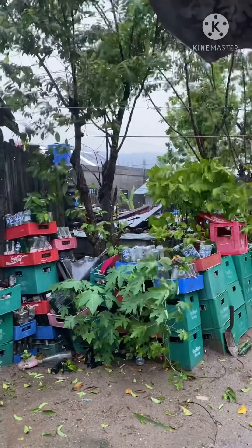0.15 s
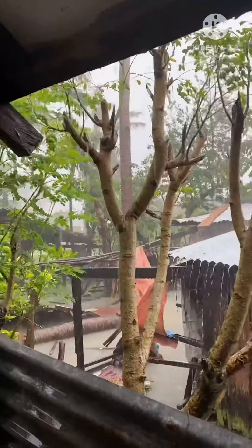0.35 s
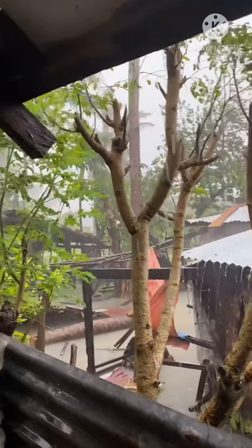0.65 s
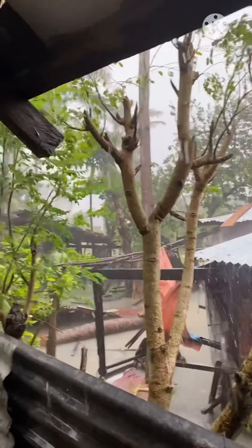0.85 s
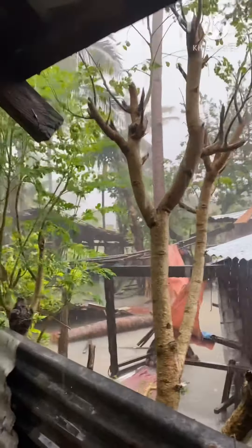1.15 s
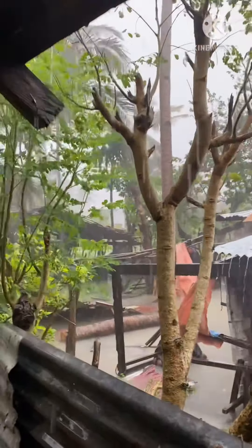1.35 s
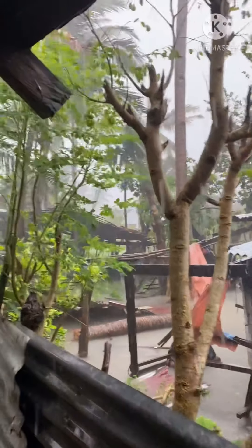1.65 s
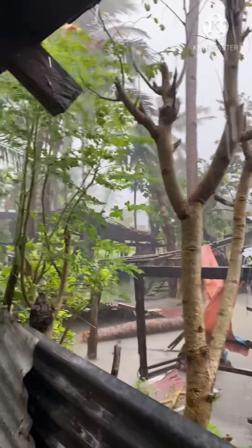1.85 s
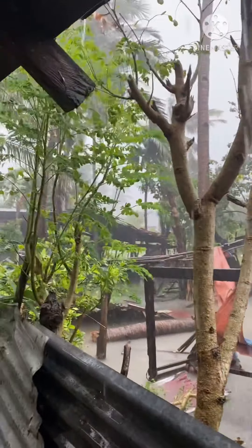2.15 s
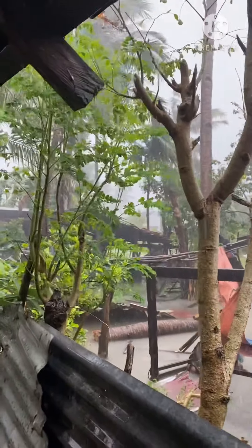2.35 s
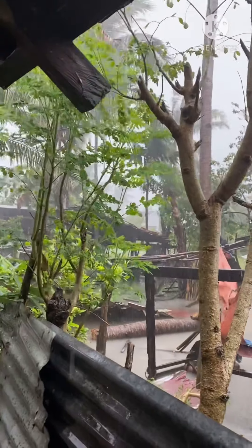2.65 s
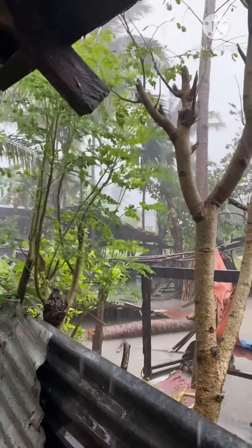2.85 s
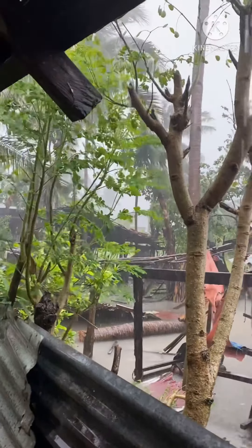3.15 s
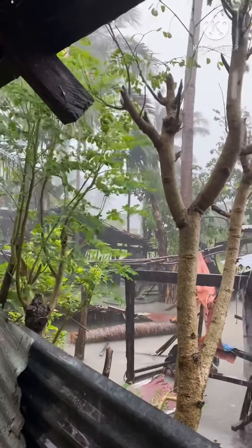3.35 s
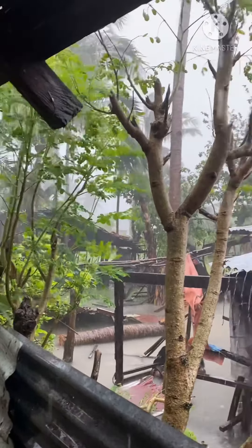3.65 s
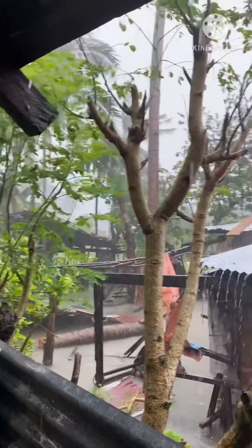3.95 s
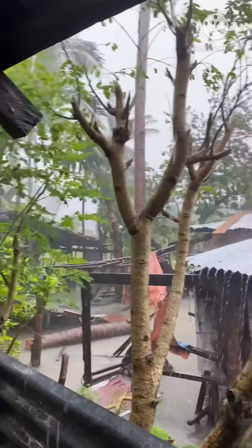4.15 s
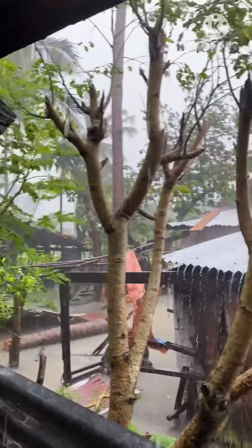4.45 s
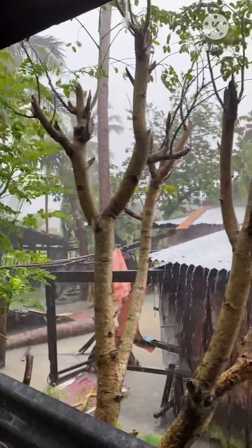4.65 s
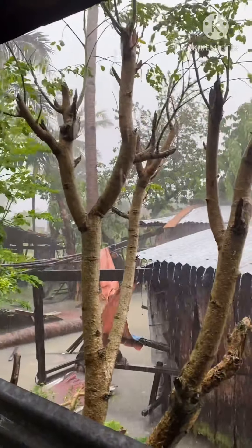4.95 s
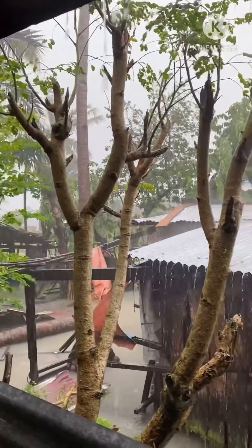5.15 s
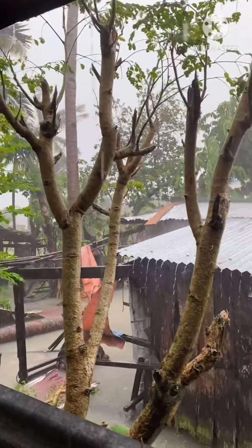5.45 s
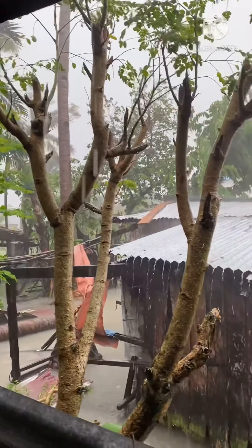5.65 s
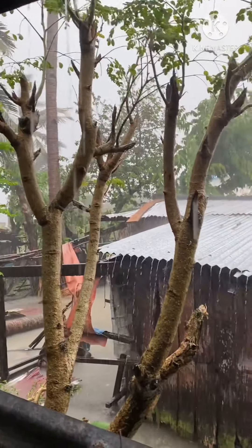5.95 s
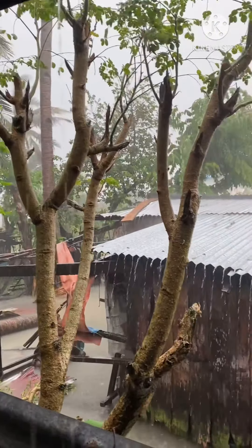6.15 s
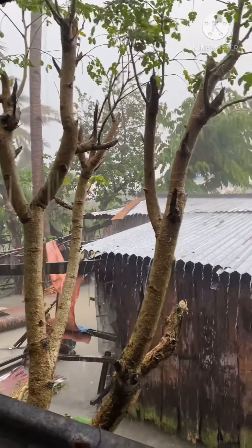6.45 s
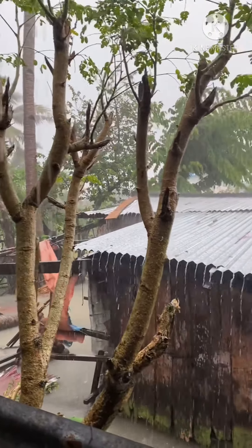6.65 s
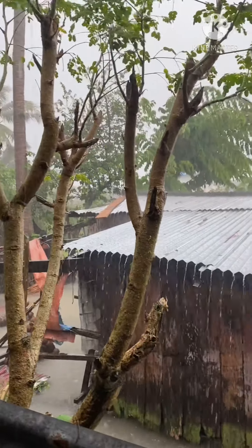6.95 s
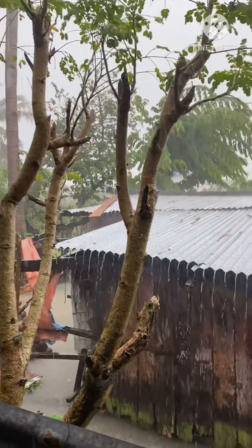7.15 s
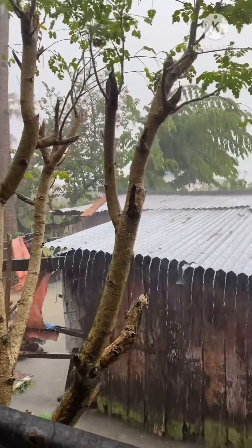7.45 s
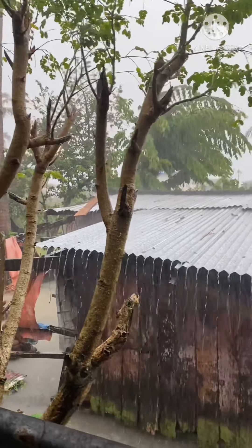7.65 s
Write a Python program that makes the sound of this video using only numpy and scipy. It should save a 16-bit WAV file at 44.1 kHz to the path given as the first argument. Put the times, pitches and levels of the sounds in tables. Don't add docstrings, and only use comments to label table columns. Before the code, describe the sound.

Steady downpour hisses and patters on corrugated metal after a short blustery opening and a gap, with close eave drips and soft wind buffets.

```python
import sys
import numpy as np
from scipy import signal
from scipy.io import wavfile
from scipy.ndimage import uniform_filter1d

SR = 44100
rng = np.random.default_rng(int(sys.argv[2]) if len(sys.argv) > 2 else 0)


def linear_from_db(decibels):
    return 10 ** (np.asarray(decibels, float) / 20)


def put_to_file(sound):
    columns = np.atleast_2d(sound).T
    safe = np.clip(columns, -1, 1)
    whole_steps = np.round(safe * 32767)
    wavfile.write(sys.argv[1], SR, whole_steps.astype(np.int16))


N = 343098


def evened(x):
    return x / np.sqrt(np.mean(x ** 2) + 1e-20)


def read(points, hz):
    f, value = np.transpose(points)
    return np.interp(np.log(hz + 1), np.log(f + 1), value)


def curve(rows, t):
    s, *columns = np.transpose(rows)
    return [np.interp(t, s, column) for column in columns]


def add(mix, s, sound):
    part = mix[:, round(s * SR):][:, :sound.shape[1]]
    part += sound[:, :part.shape[1]]


# (frequency [Hz], lead [radians])
LEAD = [(0, 0), (1980, 0.12), (3100, 1.0), (4390, 1.0), (5150, -0.6), (6100, 1.92), (7350, 3), (10600, 6.5),
        (13550, 9.5), (14800, 10.6), (16000, 12.5)]
# (frequency [Hz], left minus right [dB])
TILT = [(60, -0.5), (130, -0.3), (290, -0.5), (640, -2), (1410, -0.5), (3100, -0.5), (6820, 0.0),
        (15000, -0.5)]


def ports(pair, shape, same, size):
    hz, t, (a, b) = signal.stft(pair, SR, "cosine", size)
    like = np.clip(read(same, hz), 0, 1)[:, None]
    f, lead = np.transpose(LEAD)
    late = np.exp(-1j * np.interp(hz, f, lead))[:, None]
    tilt = linear_from_db(read(TILT, hz) / 2)[:, None]
    left = a * tilt
    right = (like * a + np.sqrt(1 - like ** 2) * b) * late / tilt
    z = np.array([left, right]) * linear_from_db(shape(hz[:, None], t))
    return evened(signal.istft(z, SR, "cosine", size)[1][:, :pair.shape[1]])


def wind(colour, same, lump, hold_s, size):
    lumps = evened(uniform_filter1d(uniform_filter1d(rng.standard_normal(size), lump), lump))
    noise = rng.standard_normal((2, size))
    air = ports(noise, lambda hz, t: read(colour, hz) + 0 * t, same, size=4096)
    hold = round(hold_s * SR)
    power = uniform_filter1d((air ** 2).mean(0), hold)
    air /= np.sqrt(power + .05)
    lumpy_db = 2.0
    return np.pad(evened(air * linear_from_db(lumpy_db * lumps)), ((0, 0), (0, N - size)))


# (time [s], gust level [dB], rain level [dB])
FIRST = [
    (0, -16, -52),
    (.015, -20.5, -50),
    (.04, -24, -52),
    (.06, -9.5, -48.5),
    (.08, -10.5, -52.5),
    (.115, -13, -48),
    (.145, -20.5, -50),
    (.19, -14.5, -51.5),
    (.215, -13, -44.5),
]
# (frequency [Hz], level per Hz [dB])
GUST = [(12, -51), (27, -20), (55, 2.5), (100, 3), (160, -3), (253, -5), (400, -8), (700, -11.5),
        (1000, -18), (1500, -39), (3000, -48.5)]
# (frequency [Hz], likeness [0 to 1])
GUST_SAME = [(60, 1), (200, 1), (350, 0.9), (700, 0.45), (2000, .6)]


def first_shot(t, wet):
    gust_db, light_db = curve(FIRST, t)
    gust = wind(GUST, GUST_SAME, lump=60, hold_s=0.01, size=SR // 2)
    return linear_from_db(gust_db) * gust + linear_from_db(light_db + 18) * wet


def drops(per_s, spread_db):
    size_db = spread_db * np.minimum(rng.exponential(1, (2, N)), 5)
    size = linear_from_db(size_db) * rng.choice([-1., 1.], (2, N))
    return size * (rng.random((2, N)) < per_s / SR)


# (frequency [Hz], level [dB], time to fall 60 dB [s])
TIN = [
    (547, 4, 0.035),
    (797, 2.5, 0.04),
    (1284, -1.5, 0.03),
    (1512, -0.5, 0.029),
    (1990, -8, 0.038),
    (2980, -13, 0.0079),
]
# (frequency [Hz], likeness [0 to 1])
SAME = [(70, 0.94), (180, 0.9), (330, 0.96), (750, 0.74), (1100, 0.83), (1600, 0.9), (1950, 0.9),
        (2400, 0.64), (4500, .5), (5300, .72), (7500, 0.71), (11000, .63), (13500, .65), (15000, .55)]


def tin():
    blows = drops(per_s=1800, spread_db=2.5)
    patch = rng.integers(0, len(TIN), (2, N))
    out = np.zeros((2, N))
    for k, (hz, db, t60) in enumerate(TIN):
        r = 1000 ** (-1 / (t60 * SR))
        turn = 2 * np.pi * hz / SR
        ring = signal.lfilter([1], [1, -2 * r * np.cos(turn), r * r], blows * (patch == k))
        out += linear_from_db(db) * np.sin(turn) * ring
    return ports(out, lambda hz, t: 0 * hz * t, SAME, size=512)


# (time [s], level [dB], brightness at the top [dB])
RAIN = [
    (0.55, -25.5, -0.5),
    (0.63, -24.5, -1),
    (3.16, -26, 0.5),
    (4.67, -24.5, 0),
    (5.0, -25, 0),
    (6.75, -25, -0.5),
    (7.1, -24, -0.5),
    (7.78, -24.5, -0.5),
]
# (frequency [Hz], level per Hz [dB])
WASH = [(40, -36), (120, -2.5), (300, -3.5), (520, -2.5), (800, 0.8), (1100, -0.44), (1500, -.5),
        (1900, -4), (2700, -6), (3800, -11), (5500, -12.5), (8000, -14.5), (11000, -16.5), (15500, -18)]


def rain():
    hits = signal.lfilter([1], [1, -.93], abs(drops(per_s=1500, spread_db=2.5)))
    spatter = hits * rng.standard_normal((2, N))
    source = rng.standard_normal((2, N)) + linear_from_db(-8) * evened(spatter)

    def shape(hz, t):
        patches = rng.standard_normal((len(hz), len(t)))
        patches = evened(uniform_filter1d(uniform_filter1d(patches, 8, axis=0), 12, axis=1))
        flicker = evened(uniform_filter1d(rng.standard_normal(len(t)), 6))
        bright_db = curve(RAIN, t)[1] * np.clip(np.log2(hz / 2500 + 1e-9) / 2, 0, 1)
        return read(WASH, hz) + bright_db + .7 * patches + 0.43 * flicker

    wash = ports(source, shape, SAME, size=512)
    return evened(wash + linear_from_db(-12.0) * tin())


# (time of peak [s], level [dB], length [s])
BUFFETS = [(.95, -40, 0.34), (1.61, -35, 0.06), (2.005, -34, 0.13), (2.55, -38, .2), (2.75, -32.5, 0.16),
           (2.972, -35, .1), (3.316, -34, .07), (3.427, -33, 0.074), (4.446, -32, .1), (4.72, -34, 0.29),
           (4.986, -25.5, 0.21), (5.197, -40, .3), (5.65, -39, 0.21), (5.983, -29.5, .12), (6.14, -24, .13),
           (6.257, -27, 0.11), (6.357, -30, 0.08), (6.584, -35, 0.07)]
# (frequency [Hz], level per Hz [dB])
RUMBLE = [(15, -50), (32, -26), (48, 1.5), (90, 2.5), (125, -0.5), (160, -13.5), (250, -20.5), (500, -52)]
# (frequency [Hz], likeness [0 to 1])
RUMBLE_SAME = [(50, 0.87), (110, 0.94), (180, 0.5)]


def buffets(t):
    breeze_db = -40
    power = linear_from_db(breeze_db) ** 2
    for s, db, length in BUFFETS:
        swell = np.cos(np.pi * np.clip((t - s) / length, -.5, .5)) ** 2
        power = power + linear_from_db(db) ** 2 * swell
    return np.sqrt(power) * wind(RUMBLE, RUMBLE_SAME, lump=900, hold_s=0.018, size=N)


# (time [s], peak level [dB], left minus right [dB])
DRIPS = [(1.22, -25, -2), (1.3506, -22.5, -1.5), (1.7795, -23, -0.5), (2.1684, -22.5, -1.0),
         (2.1919, -25, 1.5), (2.6994, -35, -0.5), (2.7794, -27, -2), (2.8794, -25, 0.5),
         (3.0096, -22.5, -1), (3.5889, -22.5, 0.0), (4.5694, -29, -2.5), (4.679, -26.5, 0.0)]


def drips():
    out, t = np.zeros((2, N)), np.arange(1200) / SR
    bright = signal.butter(1, [3500, 10000], "band", fs=SR)
    bursts = rng.standard_normal((len(DRIPS), 2, 1200))
    for (s, db, pan_db), burst in zip(DRIPS, bursts):
        decay = linear_from_db(db + 0.5 - 60 * t / 0.07)
        splash = signal.lfilter(*bright, burst) * decay * np.minimum(t / .002, 1)
        add(out, s, splash * linear_from_db(np.array([[.5], [-.5]]) * pan_db))
    return out


# (time [s], level [dB], starting pitch [Hz], length [s])
BUBBLES = [
    (6.868, -31, 735, 0.031),
    (6.905, -18.5, 610, 0.015),
    (6.923, -22, 701, 0.0265),
]


def gutter():
    out = np.zeros((2, N))
    for s, db, hz, length in BUBBLES:
        u = np.arange(0, 1, 1 / (length * SR))
        rising = np.sin(2 * np.pi * hz * length * (u + 0.144 * u ** 2))
        tone = rising * np.sin(np.pi * u) ** .5
        add(out, s, linear_from_db(db) * tone * linear_from_db(np.array([[-4.], [3.]])))
    return out


CUT_S, CUT_RAMP_S = .2212, .0015
FADE_START_S, FADE_END_S = 0.343, 0.49


def scene():
    t = np.arange(N) / SR
    wet = rain()
    first = first_shot(t, wet)
    pour = linear_from_db(curve(RAIN, t)[0] + 2.01) * wet + buffets(t) + drips() + gutter()
    fade_out = np.clip((CUT_S - t) / CUT_RAMP_S, 0, 1)
    fade_in = np.clip((t - FADE_START_S) / (FADE_END_S - FADE_START_S), 0, 1) ** 1.19
    return first * fade_out + pour * fade_in


def spell(t, start, end, edge):
    return np.clip(np.minimum(t - start, end - t) / edge + .5, 0, 1)


# (start [s], end [s], level of the left-right difference [dB])
WIDE_SPELLS = [
    (.36, 1.13, -4),
    (1.25, 1.5, -18),
    (1.5, 2.36, 2),
    (2.36, 3.3, -5),
    (4.25, 5.55, -4),
    (4.544, 5.15, 6),
    (5.662, 7.0, -6),
    (5.955, 6.75, 5.5),
]
# (frequency [Hz], margin [dB])
LOST = [(1500, 15.5), (2000, 14), (5300, 9.5), (6600, 4.5), (8000, 5.5), (9300, 3.5), (11400, 2.5),
        (12700, 4.5), (13800, 2.5), (14800, 3.0)]
# (start [s], end [s], by how much [dB])
EASED = [
    (-.2, .28, 0.3),
    (1.4, 6.45, 0.55),
    (2.2, 5.0, 0.74),
]
BANDS = [0, 64, 72, 80, 88, 96, 108, 120, 132, 144, 160, 176, 196, 216, 240, 264, 292, *range(320, 1025, 32)]


def stereo_width(x):
    sum_and_difference = [x[0] + x[1], x[0] - x[1]]
    hz, t, z = signal.stft(sum_and_difference, SR, "hann", 2048, 1536)
    mono_db, widen_s = -29, .08
    wide_db = [(db - mono_db) * spell(t, s, end, widen_s) for s, end, db in WIDE_SPELLS]
    width_db = mono_db + np.max(wide_db, axis=0)
    top_hz = np.where(width_db > 0, 340, 220)
    z[1] *= linear_from_db(width_db / (1 + (hz[:, None] / top_hz) ** 6))
    power = np.add.reduceat(abs(z) ** 2, BANDS, axis=1)
    power_db = 10 * np.log10(uniform_filter1d(power, size=3, axis=2) + 1e-20)
    eased_db = sum(db * spell(t, s, end, 0.39) for s, end, db in EASED)
    margin_db = read(LOST, hz[BANDS])[:, None] - eased_db
    kept = (power_db > power_db[::-1] - margin_db) | (hz[BANDS] < 1300)[:, None]
    kept = np.repeat(kept[:, :, ::2], 2, axis=2)[:, :, :len(t)]
    kept = np.repeat(kept, np.diff([*BANDS, len(hz)]), axis=1)
    total, apart = signal.istft(z * kept, SR, "hann", 2048, 1536)[1]
    return np.array([total + apart, total - apart])[:, :N] / 2


def top_cut(x):
    return signal.sosfilt(signal.butter(12, 17090, fs=SR, output="sos"), x)


def record(dry):
    t = np.arange(N) / SR
    low_pass = signal.firwin(1023, 15730, window=("kaiser", 10), fs=SR)
    limited = signal.oaconvolve(dry, low_pass[None], "same")
    silence = spell(t, CUT_S, FADE_START_S, CUT_RAMP_S)
    mix = stereo_width(limited) * (1 - silence)
    return top_cut(mix)


dry = scene()
out = record(dry)
put_to_file(out)
```